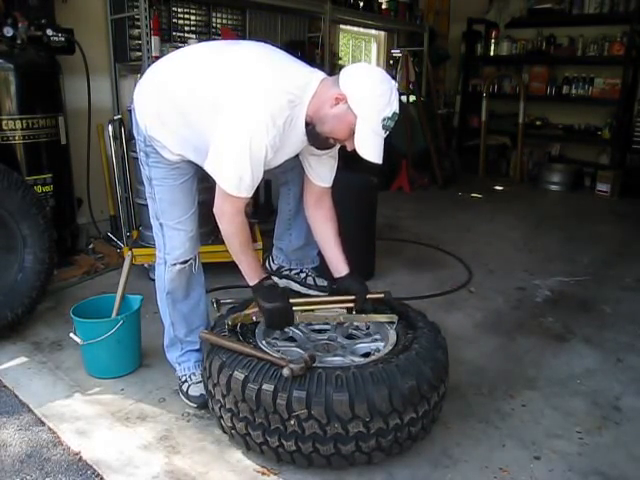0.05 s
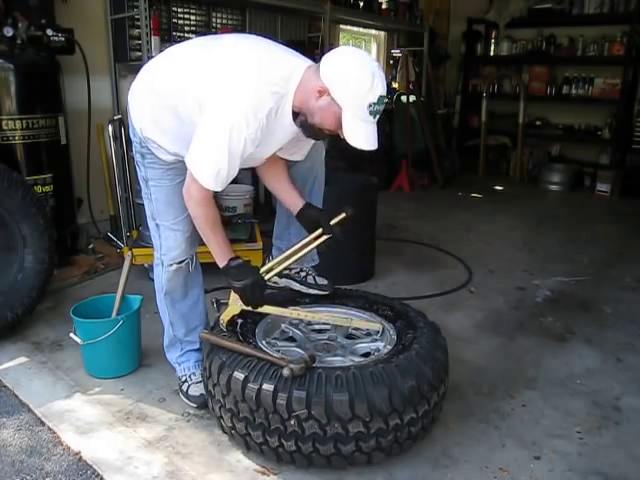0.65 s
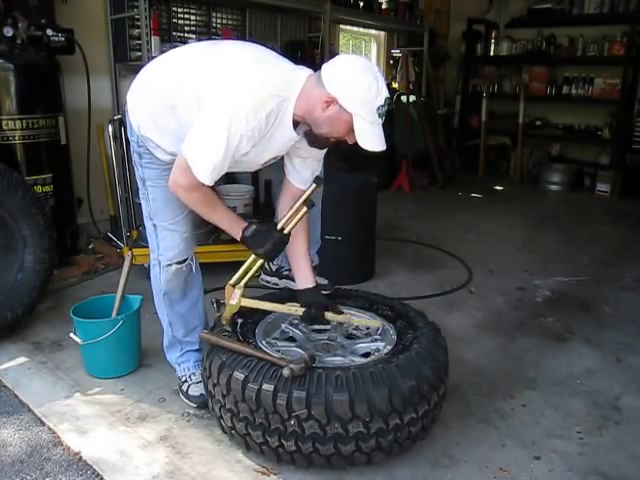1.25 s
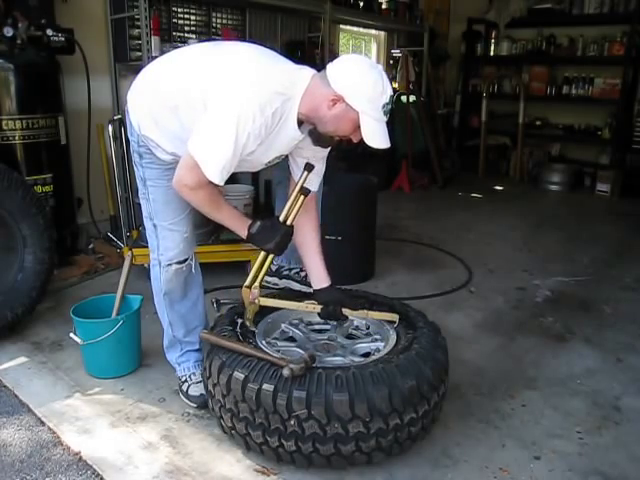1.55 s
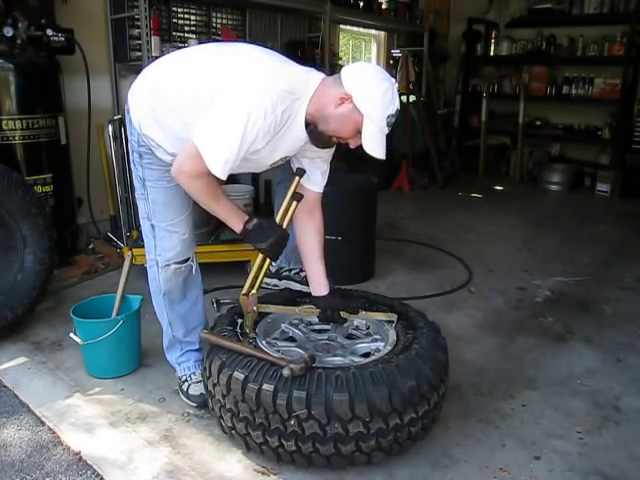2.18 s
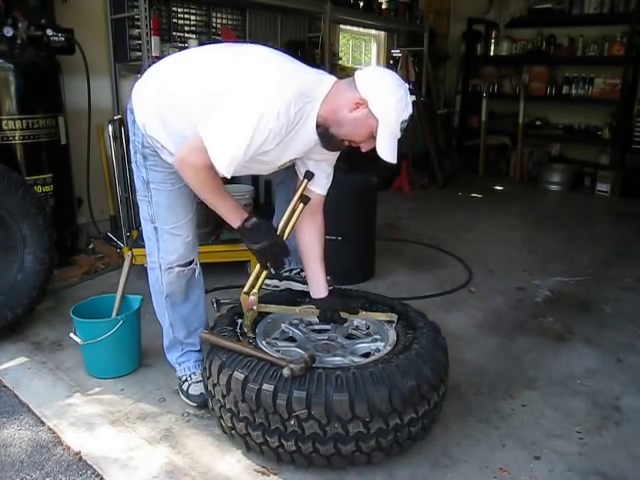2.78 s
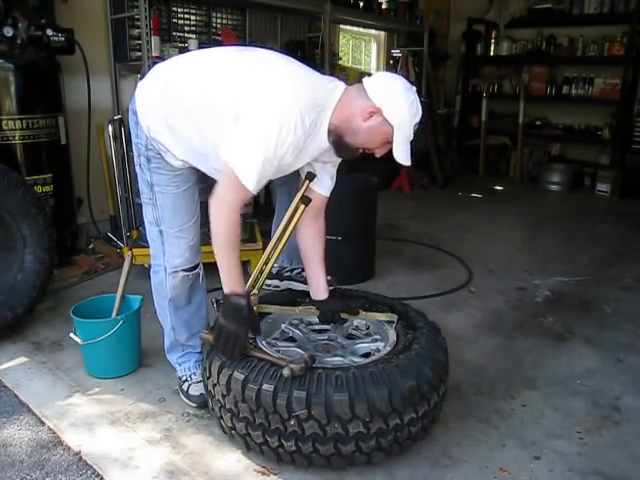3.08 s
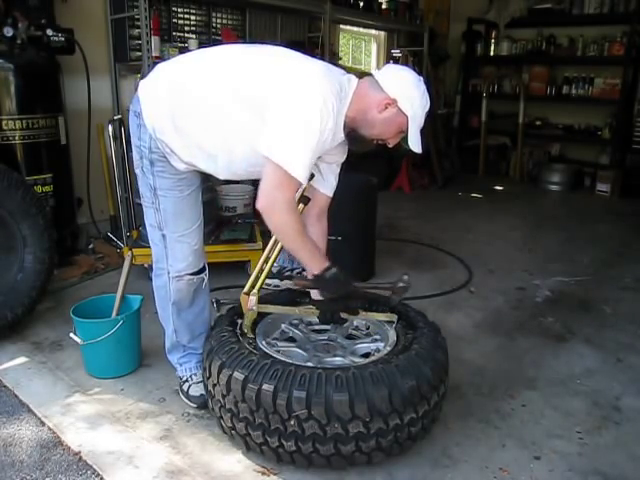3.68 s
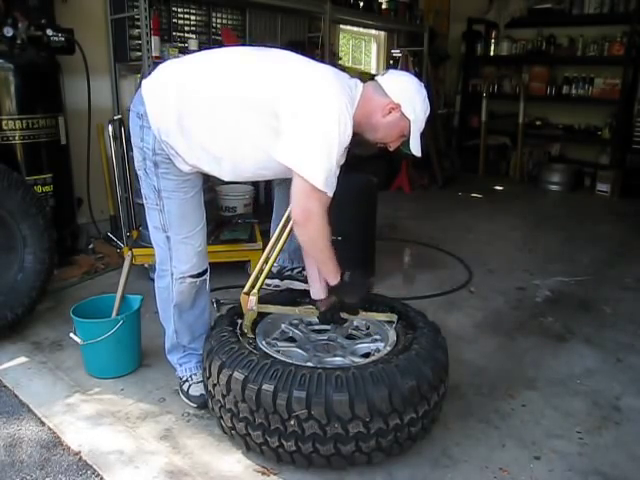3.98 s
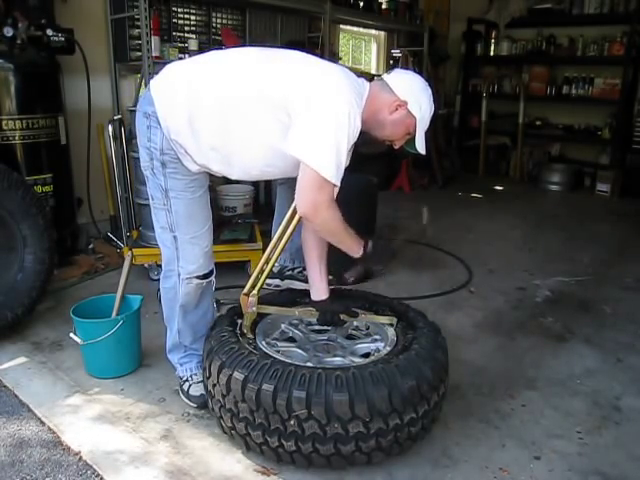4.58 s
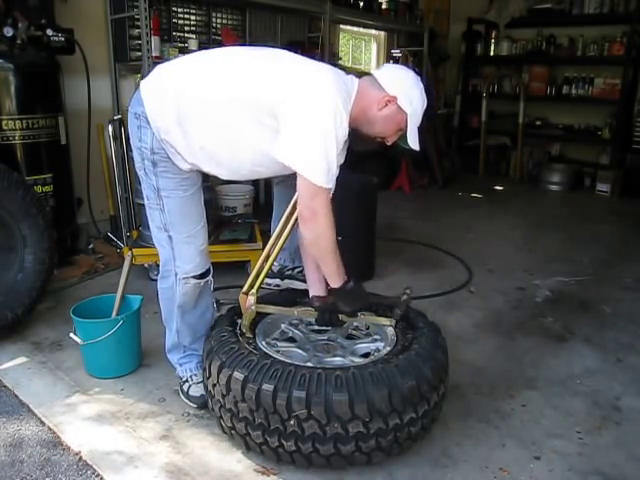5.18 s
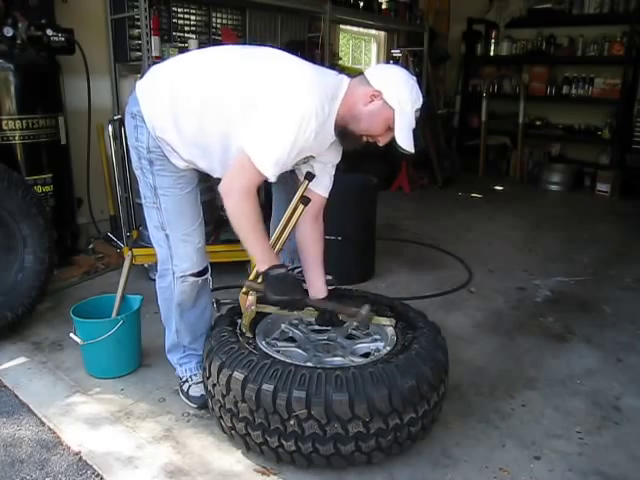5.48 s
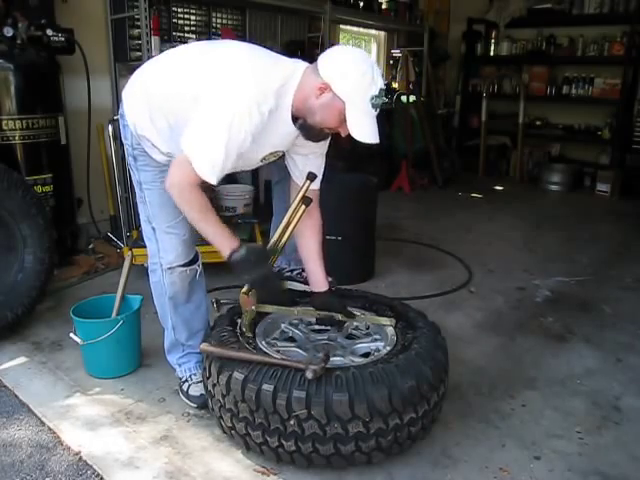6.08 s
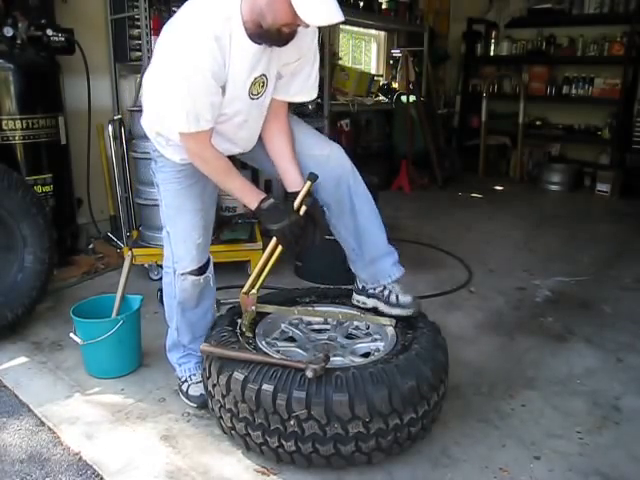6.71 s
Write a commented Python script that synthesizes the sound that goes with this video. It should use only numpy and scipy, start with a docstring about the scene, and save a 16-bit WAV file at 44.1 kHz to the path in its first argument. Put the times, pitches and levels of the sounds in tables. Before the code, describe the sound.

Steel tire pliers clank and scrape on a wheel rim, then four hard hammer blows ring out in a garage, followed by more clanks.

```python
"""Steel tire pliers clank and scrape on a wheel rim as they are levered into place in an open garage.
Dull thumps and soft rubs pass while a hammer is picked up; four blows drive the jaws in and ring the
wheel. The tools are shifted again, and the last clank leaves a handle ringing. Each knock is a snap of
metal chatter exciting the steel's modes. The blows overload the microphone, and its gain control lets
the room swell back after each one. A steady outdoor hush lies underneath."""
import sys
import numpy as np
from scipy import signal
from scipy.fft import rfft, irfft
from scipy.io import wavfile
from scipy.ndimage import minimum_filter1d

SR = 44100
rng = np.random.default_rng(int(sys.argv[2]) if len(sys.argv) > 2 else 0)


def output_pcm(signal):
    """Save a mono or channel-first signal as 16-bit PCM at the path in sys.argv[1].

    Samples are clipped to [-1, 1] before scaling.
    """
    pcm = np.clip(np.atleast_2d(signal).T, -1, 1) * 32767
    wavfile.write(sys.argv[1], SR, np.round(pcm).astype(np.int16))


N = 302085

# hammer hits on the pliers, each spot stressing its own three resonances:
# t/s, force/dB, body/dB, top/dB, thud/dB, then f/Hz, gain/dB for the low, middle and high resonance
HAMMER_BLOWS = [(4.0448, 31, -3.5, -9, -22, 426, 2.5, 4770, -1.5, 6970, 3.5),
                (4.4129, 34.5, -3.5, -13.5, -1, 710, 4.5, 3160, 1, 8140, 2),
                (4.789, 34, -1.4, -8.5, -3, 760, 6.5, 1630, -6, 6030, -3),
                (5.187, 32, 5.5, -11, 3.5, 810, 4, 2230, -4, 8600, 1)]
# EQ on the dry crack of a blow: f/Hz, gain/dB
CRACK_EQ = [(100, -1), (400, -7.5), (1000, -1), (1800, 4), (2700, -1), (16000, 0)]
# modes of the wheel, the lowest being the tire and the air inside it: f/Hz, width/Hz, gain/dB
WHEEL_MODES = [(62, 16, -4.5), (190, 25, 0), (485, 20, -1), (760, 52, -1.5), (1002, 50, -2.5),
               (1950, 290, -3.5), (2560, 37, -9), (3540, 280, -7.5), (4300, 53, -19), (6700, 340, -5.5),
               (8350, 480, -10), (11160, 200, -1), (12500, 150, -2), (13300, 180, 3), (14500, 200, -4)]
# pliers knocking on the rim:
# t/s, force/dB, body/dB, top/dB, chatter t60/s, ping f/Hz, ping gain/dB, rebound/dB
RIM_CLANKS = [(0.036, -17.5, 12, -7, 0.037, 4630, 21.5, -20), (0.1081, 5, -23, -1, 0.06, 4270, 3, -20),
              (0.464, 18, -1, -1, 0.037, 1190, 7.5, -7), (0.8542, 0, 12.5, -7, 0.055, 626, 5.5, -7),
              (0.8892, 2, 0, -1, 0.04, 3400, 9, -8), (1.2202, -1.5, -17, -3, 0.035, 8000, 7, -26),
              (1.2546, 7, -22, -2, 0.036, 8350, 8, -5), (1.506, -1, 2, -8, 0.035, 4600, 16, -7),
              (1.592, -20, 4, -7, 0.02, 10500, 2, -17), (5.612, -17, 21, 0, 0.06, 5730, 13, -6),
              (6.1771, -2, 8.5, -9.5, 0.031, 10600, 14.5, -7), (6.3973, -7.5, -7, -9, 0.036, 4950, 14, -18),
              (6.475, -24.5, 20, -5, 0.03, 1200, 8, -18), (6.765, -18, 16, -6, 0.03, 1540, -2, -18),
              (6.786, 3.5, -3, 5, 0.017, 4270, 9, -20)]
# modes of the pliers on the wheel: f/Hz, width/Hz, gain/dB
PLIER_MODES = [(190, 30, 3), (492.3, 10, 9.5), (710, 200, -7.5), (1130, 600, -18), (1898, 23, 4),
               (2260, 144, 0.5), (3350, 9.1, 6.5), (3725, 88, 3), (4500, 120, 1.5), (4690, 24, -10),
               (5260, 100, -3.5), (5900, 33, -3), (7000, 18, -23), (8450, 5.5, -10), (9070, 55, 6),
               (10600, 34, 1), (11630, 18, -8), (13400, 17, 3)]
# partials of the free handle: f/Hz, level/dB, t60/s
HANDLE_PARTIALS = [(1564, -32.5, 0.093), (3210, -44, 0.3), (6568, -25, 0.08), (9840, -19.5, 0.062),
                   (10000, -37, 0.54), (12800, -36, 0.11), (15000, -32, .15)]
# steel sliding on steel: t/s, length/s, relative level/dB, brightest f/Hz
STEEL_SCRAPES = [(0.392, 0.04, -36.5, 4900), (0.747, 0.078, -45, 4500), (1.447, 0.018, -42, 6000),
                 (5.766, 0.047, -37, 7000), (5.811, 0.078, -40, 14500), (5.883, 0.04, -44, 4000)]
# dull handling thumps: t/s, peak level/dB, f/Hz
DULL_THUMPS = [(1.668, -36, 190), (2.438, -37, 115), (2.872, -22, 220), (2.965, -28, 200),
               (2.999, -29, 190), (3.195, -29.5, 121), (3.365, -27, 120), (3.439, -29, 171),
               (4.275, -30.5, 110), (4.32, -34, 70), (6.109, -28.5, 161)]
# something soft rubbing up close: t/s, length/s, rumble level/dB, hiss level/dB
SOFT_RUBS = [(2.812, 0.25, -38, -54), (3.153, 0.12, -42, -53.5), (3.315, 0.23, -40.5, -62),
             (3.54, 0.25, -51.5, -61)]
# EQs on the low and the high layer of a rub: f/Hz, gain/dB
RUMBLE_EQ = [(15, -23), (50, 4.5), (130, -0.5), (280, -11), (600, -26), (2000, -78)]
HISS_EQ = [(1000, -20), (3000, -1.5), (5000, 1.5), (7500, -11), (13000, -6), (16000, -22)]
# reverb time of the garage: f/Hz, t60/s
GARAGE_DECAY = [(100, 0.3), (500, 0.43), (1000, 0.41), (2500, 0.46), (5000, 0.4), (9000, 0.28),
                (16000, 0.23)]
# spectrum of the outdoor hush: f/Hz, relative level/dB
HUSH_EQ = [(12, -30), (20, -15), (59, -4.5), (126, -4.5), (199, -5.5), (381, -3), (415, -3.5), (521, -2.5),
           (672, -2), (774, -1), (1120, -3.5), (1220, -5.5), (5630, -21.5), (9120, -24.5), (17500, -33)]
# narrow noise bands of a thin whine: f/Hz, width/Hz, level/dB
WHINE_BANDS = [(8960, 70, -72), (12000, 6, -84)]


def hammer(thud_hz=48):
    """Hard blows pass through the clamped jaws into the wheel, which drops on its tire with a thud."""
    out, t = np.zeros(N), np.arange(SR // 8) / SR
    thud = np.sin(2 * np.pi * thud_hz * t) * fade(t, t60=0.027)
    for s, force_db, body_db, top_db, thud_db, *spot in HAMMER_BLOWS:
        chatter, echoes = strike(chatter_t60=0.042, rise_s=0.00015, snap=0.015,
                                 near_db=-12, near_t60=0.061, wet_db=-4.5, build_s=0.001)
        tone = [(30, body_db - 11), (80, body_db + 1), (180, body_db - 3.5), (550, body_db - 0.4),
                (1400, body_db - 2.5), (2200, body_db + 0.25), (4300, 0.051), (5500, -2.2),
                (9500, 0.14), (13000, top_db + 9), (17000, top_db + 5)]
        hit = eq(eq(chatter, CRACK_EQ) + echoes, tone)
        # higher resonances are wider
        stressed = [(hz, 110 + 0.058 * hz, db) for hz, db in zip(spot[::2], spot[1::2])]
        add(out, s, amp(force_db) * ring(hit, stressed))
        add(out, s, amp(thud_db) * thud)
    return ring(out, WHEEL_MODES)


def clanks(rebound_s=0.015):
    """The pliers knock on the rim and bounce once: a ping at the contact, and the whole tool rings."""
    out = np.zeros(N)
    for s, force_db, body_db, top_db, chatter_t60, ping_hz, ping_db, rebound_db in RIM_CLANKS:
        mid_db = min(3.5 + 0.55 * body_db, 8)  # a fuller contact lifts the mids too, up to a limit
        tone = [(30, body_db - 16), (90, body_db - 5.5), (180, body_db - 2), (330, body_db - 8),
                (600, body_db), (1600, mid_db), (2900, mid_db / 2 - 2.5), (4500, 0.79), (8000, -2),
                (13000, top_db - 0.5), (17000, top_db - 15)]
        for delay_s, touch_db in [(0, 0), (rebound_s, rebound_db)]:
            chatter, echoes = strike(chatter_t60, rise_s=0.00062, snap=0.23,
                                     near_db=-5.5, near_t60=0.063, wet_db=-4, build_s=0.0025)
            ping = amp(ping_db) * resonate(chatter + 0.24 * echoes, ping_hz, width=152)
            knock = eq(chatter + echoes + ping, tone)
            add(out, s + delay_s, amp(force_db + touch_db - 2) * ring(knock, contact_modes()))
    return out


def strike(chatter_t60, rise_s, snap, near_db, near_t60, wet_db, build_s):
    """The exciter: a snap with a burst of metal chatter, and its echoes from nearby and from the room."""
    t = np.arange(SR * 3 // 4) / SR
    chatter = rng.standard_normal(len(t)) * fade(t, chatter_t60) * (1 - np.exp(-t / rise_s))
    chatter = chatter / np.linalg.norm(chatter) + snap * (t == 0)
    near = rng.standard_normal(len(t)) * fade(t, near_t60) * t  # off the wheel, floor and worker
    echoes = amp(near_db) * near / np.linalg.norm(near) + amp(wet_db) * garage(t, build_s)
    return chatter, echoes


def contact_modes(count=14, low_hz=5030, high_hz=15600):
    """Each contact point rebalances the pliers' modes and stirs its own handful of high overtones."""
    shares_db = 2 * rng.standard_normal(len(PLIER_MODES))
    modes = [(hz, width, db + share) for (hz, width, db), share in zip(PLIER_MODES, shares_db)]
    places = (np.arange(count) + rng.random(count)) / count
    return modes + [(low_hz + (high_hz - low_hz) * place, 47, 0) for place in places]


def handle(start_s=6.7865):
    """A handle rings freely after the last clank: a bright tail of decaying sines."""
    out, t = np.zeros(N), np.arange(SR // 2) / SR
    for hz, db, t60 in HANDLE_PARTIALS:
        add(out, start_s, amp(db) * fade(t, t60) * np.sin(2 * np.pi * hz * t))
    return out


def scrapes():
    """Short slides of steel on steel: a gritty run of tiny slips rings the pliers."""
    out = np.zeros(N)
    for s, length, db, hz in STEEL_SCRAPES:
        slips = rng.standard_normal(SR // 4)[:round(length * SR)] ** 3  # cubing makes the noise spiky
        slips *= signal.windows.tukey(len(slips), .8)
        grit = eq(slips, [(500, -10), (4000, -11), (10000, -5.5), (17000, -20)])
        add(out, s, amp(db - 11.5) * unit_rms(grit + resonate(slips, hz, width=2600)))
    return ring(out, PLIER_MODES)


def thumps():
    """Soft, low pushes that die in about one cycle."""
    out, t = np.zeros(N), np.arange(SR // 8) / SR
    for s, db, hz in DULL_THUMPS:
        push = np.sin(2 * np.pi * hz * t) * hz * t * np.exp(-hz * t / 0.34)
        add(out, s - .002, amp(db) * push / abs(push).max())
    return out


def rubs(attack_s=0.036, release_s=0.045, slips_per_s=300):
    """Each rub swells, holds and dies: random slips make a lumpy rumble under a faint friction hiss."""
    out, t = np.zeros(N), np.arange(N) / SR
    slips = rng.standard_normal(N) * (rng.random(N) < slips_per_s / SR)
    rumble = unit_rms(eq(slips, RUMBLE_EQ))
    hiss = unit_rms(eq(rng.standard_normal(N), HISS_EQ))
    for s, length, rumble_db, hiss_db in SOFT_RUBS:
        pressure = np.clip(np.minimum((t - s) / attack_s, (s + length - t) / release_s), 0, 1)
        out += pressure * (amp(rumble_db) * rumble + amp(hiss_db) * hiss)
    return out


def garage(t, build_s):
    """Reverb tail: reflections build up among the shelves, and each band dies at its own speed."""
    taps = rng.standard_normal(len(t)) * (rng.random(len(t)) < .1 + 6 * t)
    taps *= 1 - np.exp(-t / build_s)
    hz, age, bands = signal.stft(taps, SR, nperseg=256)
    bands *= fade(age, curve(GARAGE_DECAY, hz)[:, None])
    tail = signal.istft(bands, SR, nperseg=256)[1][:len(t)]
    tone = [(60, 0.7), (300, 2), (700, -2.5), (3000, -6.5), (8000, -2), (15000, -4.5)]
    return eq(tail / np.linalg.norm(tail), tone)


def air(hush_db=-45):
    """The ambience bed: a steady outdoor hush through the open door, and a faint thin whine."""
    spectrum = amp(curve(HUSH_EQ, np.fft.rfftfreq(N, 1 / SR)))
    hush = irfft(rfft(rng.standard_normal(N)) * spectrum, N)
    whine = sum(amp(db) * unit_rms(resonate(rng.standard_normal(N), hz, width))
                for hz, width, db in WHINE_BANDS)
    return amp(hush_db) * unit_rms(hush) + whine


def ring(x, modes):
    """Resonators in series (f/Hz, width/Hz, gain/dB), each adding its ring to the sound."""
    for hz, width, db in modes:
        x = x + amp(db) * resonate(x, hz, width)
    return x


def resonate(x, hz, width):
    """One resonant band-pass, unity gain at its peak."""
    return signal.lfilter(*signal.iirpeak(hz, hz / width, SR), x)


def eq(x, points, size=2048):
    """Minimum-phase EQ (f/Hz, gain/dB): nothing sounds before the attack."""
    log_gain = np.log(amp(curve(points, abs(np.fft.fftfreq(size, 1 / SR)))))
    taps = np.fft.ifft(np.exp(np.conj(signal.hilbert(log_gain)))).real
    return signal.fftconvolve(x, taps)[:len(x)]


def curve(points, hz):
    """Interpolates breakpoints (f/Hz, value) on a log-frequency axis."""
    f, value = np.transpose(points)
    return np.interp(np.log(hz + 1), np.log(f + 1), value)


def fade(t, t60):
    """Decay envelope: falls 60 dB in t60 seconds."""
    return np.exp(-np.log(1000) * t / t60)


def amp(db):
    """Decibels to gain."""
    return 10 ** (np.asarray(db) / 20)


def unit_rms(x):
    """Normalises to an rms of one."""
    return x / np.sqrt(np.mean(x ** 2) + 1e-20)


def add(mix, s, sound):
    """Mixes a sound in at time s."""
    part = mix[max(round(s * SR), 0):][:len(sound)]
    part += sound[:len(part)]


def scene():
    """Mono mix: the steel tools up front, thumps and rubs behind them, all over the ambience bed."""
    return (clanks() + scrapes() + handle() + hammer() + thumps() + rubs() + air())[None]


def record(dry, threshold_db=-17, slope=0.85, attack_s=0.0011, hold_s=0.0069, recovery_db_per_s=165):
    """Gain control ducks each blow, holds and recovers; the transient soft-clips; then a low-pass."""
    smooth = np.exp(-1 / (0.0058 * SR))
    power_db = 10 * np.log10(signal.lfilter([1 - smooth], [1, -smooth], dry[0] ** 2) + 1e-12)
    half = int(hold_s * SR / 2)
    held_db = -minimum_filter1d(-power_db, 2 * half + 1, origin=half)  # loudest recent moment
    fall_db = np.arange(N) * recovery_db_per_s / SR
    envelope_db = np.maximum.accumulate(held_db + fall_db) - fall_db  # jumps up, sinks at a steady rate
    over_db = np.maximum(envelope_db - threshold_db, 0)
    lag = np.exp(-1 / (attack_s * SR))
    duck_db = signal.lfilter([1 - lag], [1, -lag], slope * over_db)
    ceiling, cutoff_hz = .88, 17100
    clipped = ceiling * np.tanh(dry * amp(-duck_db) / ceiling)
    low_pass = signal.firwin(601, cutoff_hz, window=("kaiser", 8), fs=SR)
    return signal.oaconvolve(clipped, low_pass[None], "same")


dry = scene()
out = record(dry)
output_pcm(out)
```